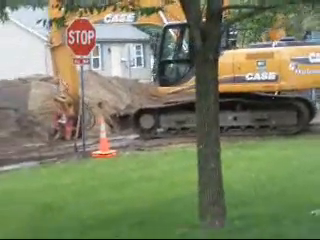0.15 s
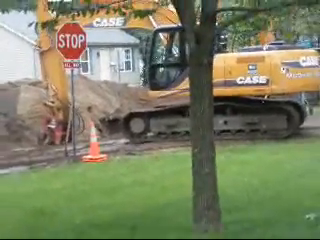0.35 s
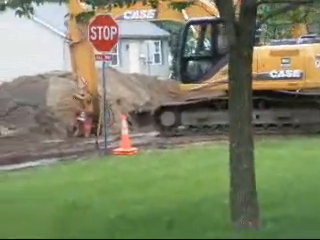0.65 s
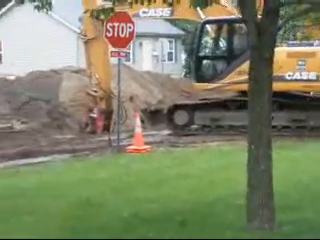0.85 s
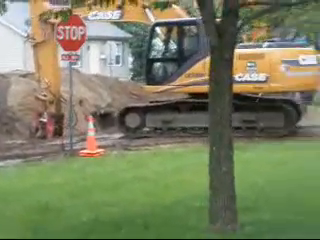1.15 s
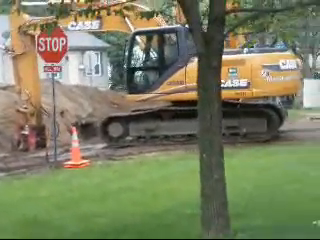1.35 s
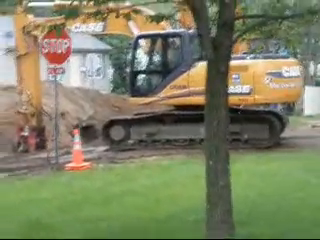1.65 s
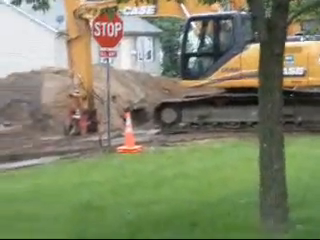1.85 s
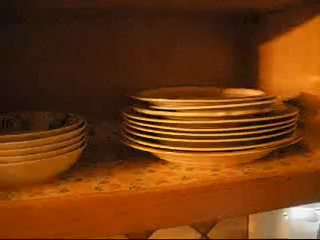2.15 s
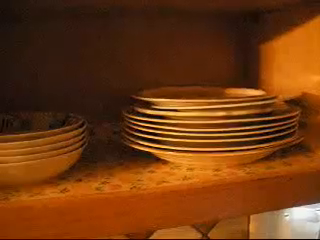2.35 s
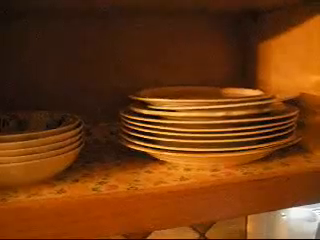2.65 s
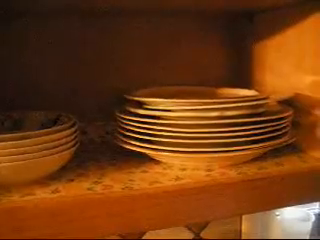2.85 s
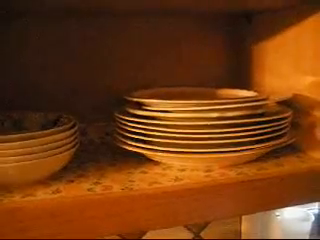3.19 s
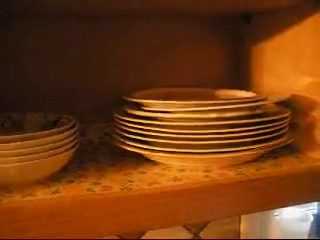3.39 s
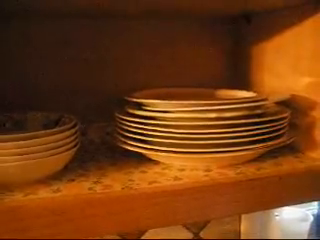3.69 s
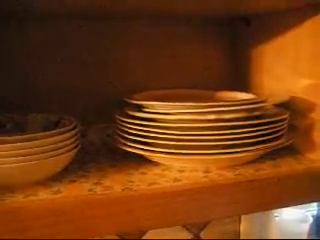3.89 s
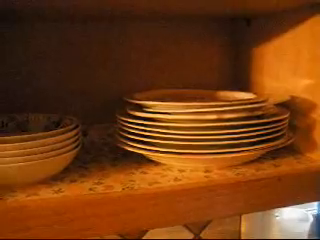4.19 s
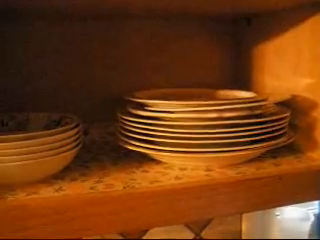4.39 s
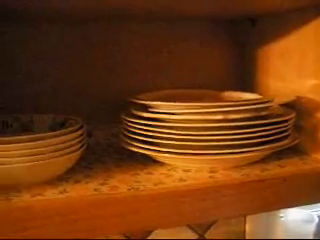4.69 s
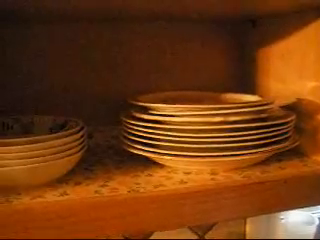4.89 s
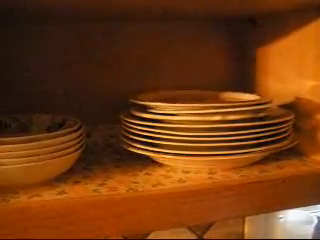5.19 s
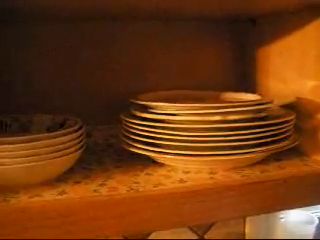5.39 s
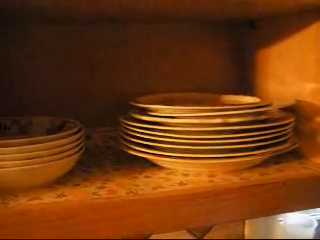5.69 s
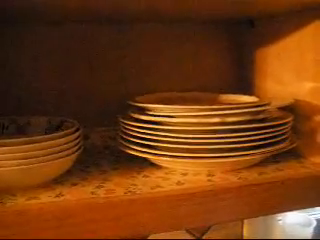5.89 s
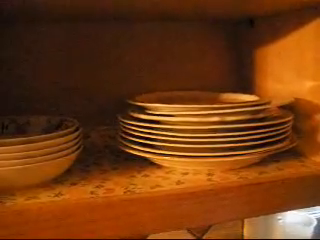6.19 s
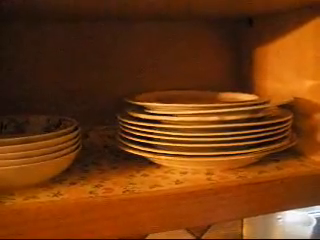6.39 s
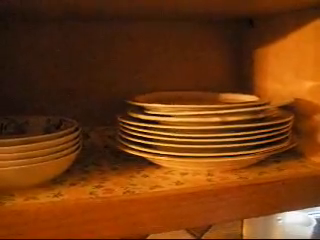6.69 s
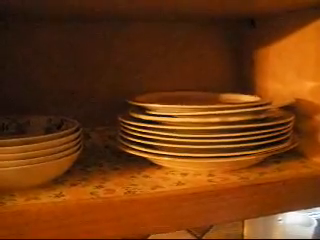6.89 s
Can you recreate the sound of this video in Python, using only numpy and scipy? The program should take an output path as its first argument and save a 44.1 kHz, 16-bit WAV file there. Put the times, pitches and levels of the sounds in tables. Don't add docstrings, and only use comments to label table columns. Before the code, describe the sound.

Outdoor excavator vibratory hammer roars and chatters on ringing steel, then abruptly indoors: stacked plates clink rapidly, quieten, and rattle again over muffled machinery.

```python
import sys
import numpy as np
from scipy import signal
from scipy.fft import rfft, irfft
from scipy.io import wavfile

SR = 44100
rng = np.random.default_rng(int(sys.argv[2]) if len(sys.argv) > 2 else 0)


def persist_wave(psi):
    counts = np.round(np.clip(psi, -1, 1) * 32767).astype(np.int16)
    wavfile.write(sys.argv[1], SR, np.atleast_2d(counts).T)


def attenuation_scalar(level_db):
    decades = np.asarray(level_db, float) / 20
    return 10 ** decades


N = 310905
T = np.arange(N) / SR

# mode_hz, level_db, t60_s
STEEL_MID = [(1122, -11, 0.069), (1199, -5, 0.1), (1334, 1.5, 0.073), (1430, 2, 0.029),
             (1544, -9.5, 0.0063), (1825, 8, 0.031), (1860, -1.5, 0.046), (2100, 4, 0.04)]
# mode_hz, level_db, t60_s
STEEL_HIGH = [(2408, -5.5, 0.025), (2740, -0.5, 0.016), (3145, -9.5, 0.034), (3487, -0.5, 0.028),
              (3698, -1.5, .025)]


def unit(x):
    return x / np.sqrt(np.mean(x ** 2))


def curves(table):
    s, *columns = np.transpose(table)
    return [np.interp(T, s, c) for c in columns]


def band(x, lo_hz, hi_hz, order=2):
    return signal.sosfilt(signal.butter(order, [lo_hz, hi_hz], "band", fs=SR, output="sos"), x)


def walk(rate):
    return 1.1 * np.interp(T * rate, np.arange(N // 256), rng.standard_normal(N // 256))


def ring(force, modes, vary_db, vary_rate, order=1):
    out = np.zeros(N)
    for hz, db, t60 in modes:
        r = np.exp(-np.log(1000) / (t60 * SR))
        angle = 2 * np.pi * hz / SR
        y = force * attenuation_scalar(db + vary_db * walk(vary_rate))
        for _ in range(order):
            y = signal.lfilter([np.sin(angle)], [1, -2 * r * np.cos(angle), r * r], y)
        out += y * (2 * np.e * (1 - r)) ** (order - 1)
    return out


def clicks(times, dbs):
    force = np.zeros(N)
    np.add.at(force, (times * SR).astype(int), attenuation_scalar(dbs))
    return force


def contacts(times, dbs, rise_s, fall_s):
    force, t = np.zeros(N + 2048), np.arange(2048) / SR
    shape = (1 - np.exp(-t / rise_s)) * np.exp(-t / fall_s)
    grit = rng.standard_normal((len(times), len(t))) * shape
    for s, db, g in zip(times, dbs, grit):
        i = int(s * SR)
        force[i:i + len(t)] += attenuation_scalar(db) * g / np.sqrt(np.sum(g ** 2))
    return force[:N]


def joist():
    # centre_s, pitch_hz, level_db (rms), half_length_s
    swells = [
        (4.55, 143.3, -57, 0.24),
        (6.294, 129.2, -45, 0.052),
        (6.419, 134, -44.5, 0.045),
        (6.64, 143.6, -45, 0.1),
        (6.965, 144, -42, .11),
    ]
    s, hz, db, half_s = np.transpose(swells)
    size = attenuation_scalar(-61) + sum(attenuation_scalar(d) * np.exp(-((T - a) / h) ** 2) for a, d, h in zip(s, db, half_s))
    phase = 2 * np.pi * np.cumsum(np.interp(T, s, hz)) / SR
    return size * attenuation_scalar(1.7 * walk(20)) * np.sqrt(2) * np.sin(phase)


def house():
    # start_s, airborne_db, floor_shake_db
    machine = [(2.31, -49, -67), (2.33, -42, -48), (2.4, -36, -43.5), (2.76, -39.5, -44.5),
               (3.34, -41, -44), (3.51, -44.5, -44.5), (4.0, -41, -46), (4.02, -36.5, -44.5),
               (4.29, -40, -45), (4.66, -41.5, -48.5), (4.9, -46, -49.5), (5.27, -49, -52),
               (5.86, -48.5, -53.5), (5.9, -41.5, -51), (6.25, -36.5, -41.5), (6.57, -34, -41.5),
               (6.8, -43, -44.5), (7.05, -39, -47)]
    # centre_hz, width_hz, level_db
    walls = [(611.5, 42, -5), (857, 240, 2), (1158, 270, 0), (1460, 150, -4.5), (1661, 450, -5.5),
             (1964, 130, -10)]
    # pitch_hz, level_db (rms)
    engine_tones = [(59.2, -60), (269.2, -56), (538.3, -60), (812.9, -62.5)]
    site_db, rumble_db = curves(machine)
    rattle_db = .4 * site_db + 0.54 * rumble_db - 10.0
    grainy = rng.standard_normal(N) * attenuation_scalar(1.3 * walk(60))
    site = np.zeros(N)
    for hz, width, db in walls:
        site += attenuation_scalar(db + 1.9 * walk(17)) * unit(band(grainy, hz - width / 2, hz + width / 2, order=1))
    rumble = unit(band(rng.standard_normal(N), 190, 460)) * attenuation_scalar(1.5 * walk(12))
    rattle = unit(band(grainy, 2250, 4000))
    deep = unit(band(rng.standard_normal(N), 75, 170))
    hum = np.zeros(N)
    for hz, db in engine_tones:
        hum += np.sqrt(2) * attenuation_scalar(db + 2.8 * walk(3.9)) * np.sin(2 * np.pi * hz * T)
    airborne = attenuation_scalar(site_db + 1.5) * unit(site) + attenuation_scalar(rattle_db - 5.5) * rattle
    floor = attenuation_scalar(rumble_db + 1.0) * (rumble + attenuation_scalar(-6.0) * deep) + joist()
    return airborne + floor + attenuation_scalar(0.26 * (rumble_db + 53.0)) * hum


def cupboard(dry):
    dry = dry + attenuation_scalar(-10 + 3 * walk(25)) * np.roll(dry, int(.0205 * SR))
    t = np.arange(SR // 5) / SR
    tail = rng.standard_normal(SR // 5) * np.exp(-np.log(1000) * t / 0.22)
    tail = band(tail, 300, 2800, order=1)
    return dry + attenuation_scalar(-14.5) * signal.fftconvolve(dry, tail / np.sqrt(np.sum(tail ** 2)))[:N]


def plates():
    # start_s, peak_db
    clinks = [(2.3213, -31), (2.3801, -15), (2.439, -21), (2.4994, -17.5), (2.5602, -16.5), (2.6231, -24.5),
              (2.6785, -16), (2.7428, -21.5), (2.8012, -16), (2.865, -29), (2.9219, -16), (2.9843, -24),
              (3.0431, -15), (3.1065, -31.5), (3.1639, -14.5), (3.2242, -35), (3.2856, -18.5),
              (3.3455, -31), (3.4078, -26), (3.4687, -26.5), (3.528, -28), (3.5904, -27), (3.6503, -28),
              (3.7116, -25), (3.7705, -27.5), (3.8333, -26), (3.8937, -27.5), (3.9551, -26), (4.0179, -30),
              (4.1706, -26.5)]
    # start_s, peak_db
    rebounds = [(2.6391, -16.5), (2.7613, -22), (2.8825, -21), (3.123, -26.5), (3.2442, -36), (3.308, -30),
                (3.5505, -35), (3.6717, -39), (3.4283, -41), (3.9152, -41), (4.0469, -35.5), (4.1387, -40)]
    # start_s, peak_db
    late_clinks = [(6.3373, -20.5), (6.3996, -21.5), (6.4345, -24), (6.455, -37), (6.4919, -15.5),
                   (6.5241, -15.5), (6.5602, -12.5), (6.624, -23.5), (6.676, -19.5), (6.7054, -36),
                   (6.7385, -21), (6.8416, -35.5), (6.867, -27), (6.9581, -26), (6.989, -28), (7.0134, -21),
                   (7.043, -26)]
    # start_s, peak_db
    shelf_knocks = [
        (3.4283, -49),
        (3.9152, -47),
        (4.047, -47),
        (4.075, -40.5),
        (4.108, -41),
        (4.1387, -42),
        (4.19, -42.5),
    ]
    # mode_hz, level_db, t60_s
    rim_modes = [(2204, -11, 0.022), (2555, -4, 0.024), (2910, 4, 0.01), (3007, -1.5, 0.013),
                 (3210, -4, 0.015), (3820, -12, .02), (3876, -0.5, 0.018)]
    body_modes = [(605, -10.5, .06), (932, 2.5, 0.027), (1291, -1.5, 0.056), (1526, -5, .05),
                  (1888, -4.5, .055), (1945, -1, 0.038), (2308, -6.5, 0.038)]
    shelf_modes = [(784, 4, 0.019), (832, -3, 0.028), (1135, -6, 0.033)]
    ping_modes = [(3450, 6, 0.014)]
    # start_s, end_s
    rocking_span = (3.33, 4.2)
    s, peak_db = np.transpose(clinks + rebounds + late_clinks)
    harder_db = peak_db + 25
    rocking = (s > rocking_span[0]) & (s < rocking_span[1])
    grit = contacts(s - .0035, peak_db, .0015, .0058)
    rim = ring(.85 * grit + .4 * clicks(s - .002, peak_db), rim_modes, 1.5, 30, order=2)
    ping = ring(clicks(s + .0007, peak_db - 15), ping_modes, 0.58, 30, order=2)
    body_db = -35 + 0.75 * harder_db - 3 * rocking
    shelf_db = -41.5 + 0.084 * harder_db + 1.5 * rocking
    body_force = clicks(s - .002, body_db) + .35 * contacts(s, body_db, .002, .008)
    body = ring(body_force, body_modes, 1.5, 30, order=2)
    shelf_force = clicks(s, shelf_db) + clicks(*np.transpose(shelf_knocks))
    shelf = ring(shelf_force, shelf_modes, 0.74, 30, order=2)
    china = attenuation_scalar(9) * band(grit, 890, 3900) + attenuation_scalar(-12.5) * rim + attenuation_scalar(4.0) * ping + attenuation_scalar(-3.5) * body
    return cupboard(china + attenuation_scalar(-0.5) * shelf)


def blow_comb(turns, turns_per_s, grip_db, pile_db):
    beat = np.diff(np.floor(turns), prepend=0)
    comb = attenuation_scalar(grip_db - 31.5) * unit(band(beat, 96, 310))
    comb += attenuation_scalar(1.6 * pile_db - 26) * unit(band(beat, 695, 750))
    slow = np.clip(33 - turns_per_s, 0, None)
    gear_db = np.minimum(1.5 * grip_db, -3) - 22 - 5 * slow + 2 * walk(25)
    return comb + attenuation_scalar(gear_db) * np.sqrt(2) * np.sin(2 * np.pi * 20 * turns)


def exhaust_roar(shake, chatter):
    # frequency_hz, level_db (per Hz)
    roar_spectrum = [(35, -54), (60, -32), (149, -12.5), (463, -10), (729, -2), (1030, -3.5), (1810, -2),
                     (1940, -5.5), (2310, -4), (3050, -11), (3570, -13.5), (3900, -15), (5070, -34),
                     (8580, -120)]
    hz, db = np.transpose(roar_spectrum)
    colour = attenuation_scalar(np.interp(np.log(np.fft.rfftfreq(N, 1 / SR) + 1), np.log(hz), db))
    source = shake * rng.standard_normal(N) + .5 * unit(chatter)
    return unit(irfft(rfft(source) * colour, N))


def metal_knocks(pile_db, low_modes):
    # start_s, peak_db
    hard_knocks = [(.0513, -3), (.084, 5), (.1281, 2.5), (.16, -11), (.2524, 3.5), (.3002, 3.5),
                   (.3735, -12), (.403, 9.5), (.4499, 7), (.4938, -2), (.538, -10), (.604, -6), (.847, 3),
                   (.9847, -8), (1.0273, -2), (1.1094, -14), (1.1663, 3), (1.1971, 0), (1.2674, 3.5),
                   (1.3503, -2), (1.4087, 5), (1.6294, 5.5), (1.6889, 6), (1.7547, 7.5), (1.784, 7.5),
                   (1.8791, 3.5), (1.9759, 0), (2.0402, 4.5), (2.0777, -3), (2.1276, 5)]
    s, peak_db = np.transpose(hard_knocks)
    ring_db = .6 * pile_db[(s * SR).astype(int)] - 8.5
    sharp = contacts(s - .001, peak_db, 0.0008, 0.0026) + .5 * clicks(s, peak_db)
    blunt = contacts(s - .001, peak_db + ring_db, 0.00059, 0.0064)
    knocks = attenuation_scalar(-4) * band(sharp, 700, 4800)
    knocks += attenuation_scalar(-28.5) * ring(sharp, STEEL_MID + STEEL_HIGH, 4.8, 31.5)
    return knocks + attenuation_scalar(-21.5) * ring(blunt, low_modes, 4.6, 30)


def hammer():
    # start_s, clatter_db, ground_grip_db, pile_ringing_db
    driving = [
        (0, -19, -22, -12),
        (.11, -20, -14, -4),
        (.25, -19.5, -8, -19),
        (.6, -19.5, -23.5, -12),
        (.9, -18.5, -14, -4),
        (1.3, -19, -2.5, 3),
        (1.57, -19.5, 4, -6.5),
        (1.9, -19.5, -5.5, 2),
        (2.22, -18, -0.5, 1.5),
    ]
    # start_s, turns_per_s
    shaft_speed = [
        (0, 30),
        (.5, 32),
        (.9, 34.5),
        (1.1, 35.7),
        (1.27, 35.6),
        (1.5, 34.1),
        (1.8, 31.4),
        (1.95, 30.7),
        (2.22, 30.7),
    ]
    # centre_s, rise_db, half_length_s
    surges = [
        (.005, 2, .01),
        (0.057, 1.5, 0.013),
        (0.129, 5.5, 0.0093),
        (0.165, 3, 0.01),
        (0.318, 3.5, 0.011),
        (0.409, 4, 0.0079),
        (.51, 1.5, 0.015),
        (1.698, 2.5, .01),
    ]
    # mode_hz, level_db, t60_s
    steel_low = [(550, -13.5, 0.12), (578, -7.5, 0.25), (662, 2.5, 0.21), (743, -11.5, 0.36),
                 (771, -8, 0.21), (803.5, 5, 0.069), (864, 2, 0.16)]
    level_db, grip_db, pile_db = curves(driving)
    for s, db, half_s in surges:
        level_db = level_db + db * np.exp(-((T - s) / half_s) ** 2)
    turns_per_s = curves(shaft_speed)[0]
    turns = np.cumsum(turns_per_s) / SR + .004 * walk(12)
    blow = attenuation_scalar(2.2 * rng.standard_normal(N // 256))[np.abs(turns).astype(int)]
    shake = 3.3 + blow * np.exp(-(turns % 1) / 0.16)
    taps = rng.standard_normal(N) * (rng.random(N) < .12)
    chatter = shake * taps * attenuation_scalar(1.8 * rng.exponential(size=N))
    low = unit(ring(chatter, steel_low, 2.18, 5.78))
    mid = unit(ring(chatter, STEEL_MID, 4, 14))
    high = unit(ring(chatter, STEEL_HIGH, 1.8, 20))
    thud = unit(band(rng.standard_normal(N), 130, 420))
    steady = attenuation_scalar(-5.0) * mid + attenuation_scalar(.15 * pile_db - 4) * low + attenuation_scalar(-.3 * grip_db - 9.5) * high
    steady += attenuation_scalar(0.39 * grip_db - 16.5) * thud + attenuation_scalar(2.0) * exhaust_roar(shake, chatter)
    clatter = attenuation_scalar(level_db) * steady + metal_knocks(pile_db, steel_low)
    return band(clatter, 140, 5400, order=3) + blow_comb(turns, turns_per_s, grip_db, pile_db)


def scene():
    after = T - 2.2168
    outdoors = np.where(after < 0, 1, attenuation_scalar(-12.5) * np.clip(1 - after / 0.023, 0, 1))
    return (outdoors * hammer() + (after > 0) * (plates() + house()))[None]


def roll_off(x):
    return signal.sosfilt(signal.butter(12, 13030, fs=SR, output="sos"), x)


def record(dry):
    # start_s, limit_hz
    top_edge = [(0, 12300), (.75, 12250), (1.3, 12140), (1.85, 11580), (2, 11730), (2.8, 12000),
                (3.5, 12400), (4.5, 12650), (7.05, 12760)]
    hold_hz, steps = 8001.43, 128
    x = signal.sosfilt(signal.butter(6, 4200, fs=SR, output="sos"), dry[0])
    ticks = np.floor(T * hold_hz) / hold_hz
    held = np.floor(np.clip(np.interp(ticks, T, x), -.9, .9) * steps) / steps
    hz, s, z = signal.stft(held, SR, nperseg=1024)
    z = z * (hz[:, None] < np.interp(s, *np.transpose(top_edge)))
    y = signal.istft(z, SR, nperseg=1024)[1][:N]
    return roll_off(y[None])


dry = scene()
out = record(dry)
persist_wave(out)
```